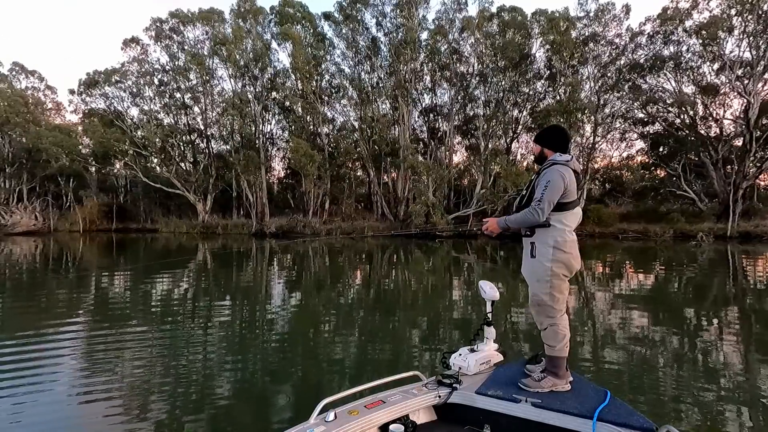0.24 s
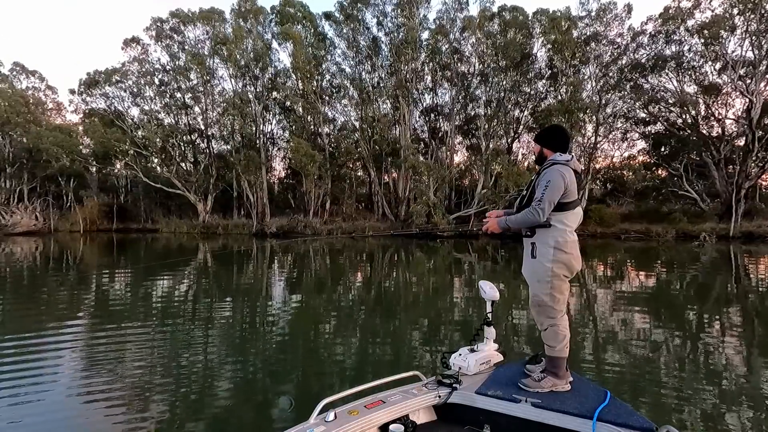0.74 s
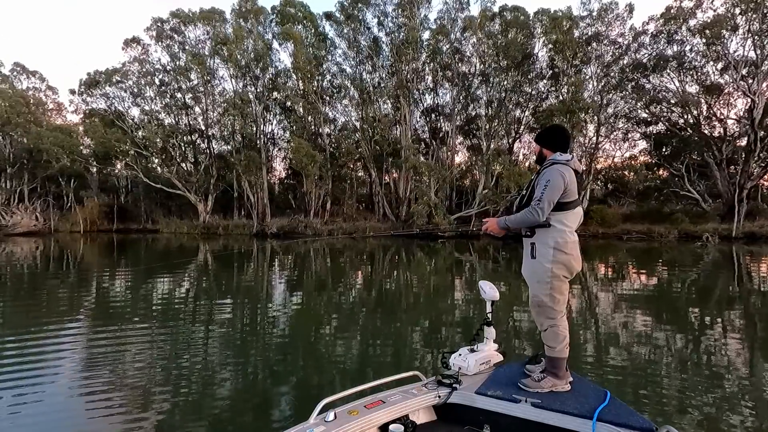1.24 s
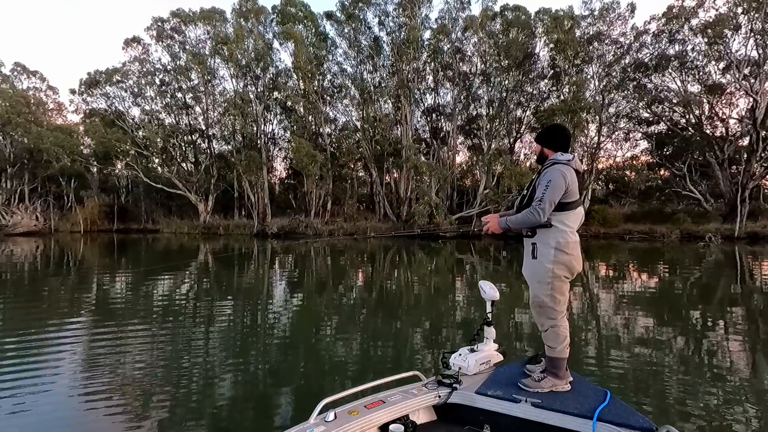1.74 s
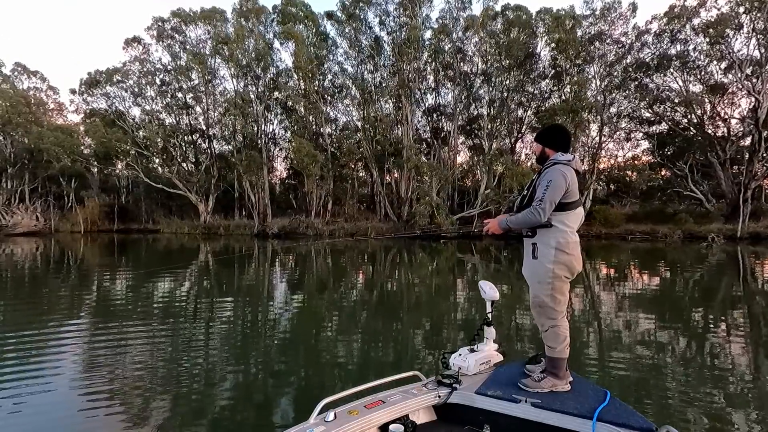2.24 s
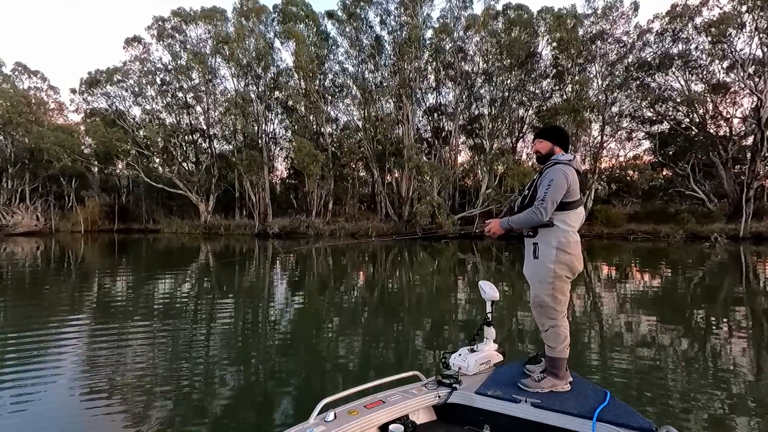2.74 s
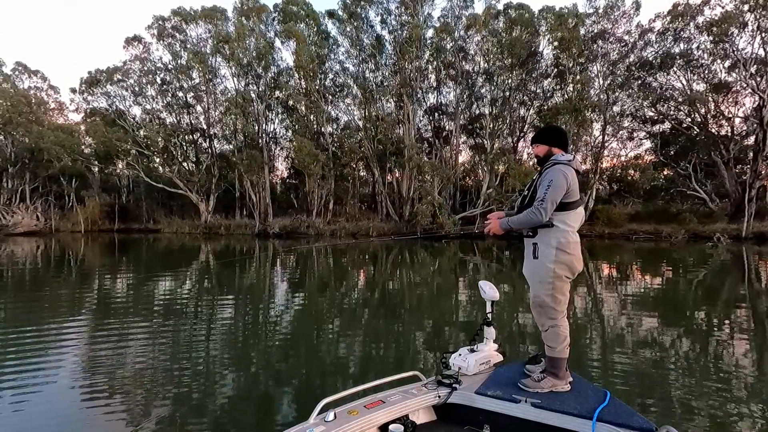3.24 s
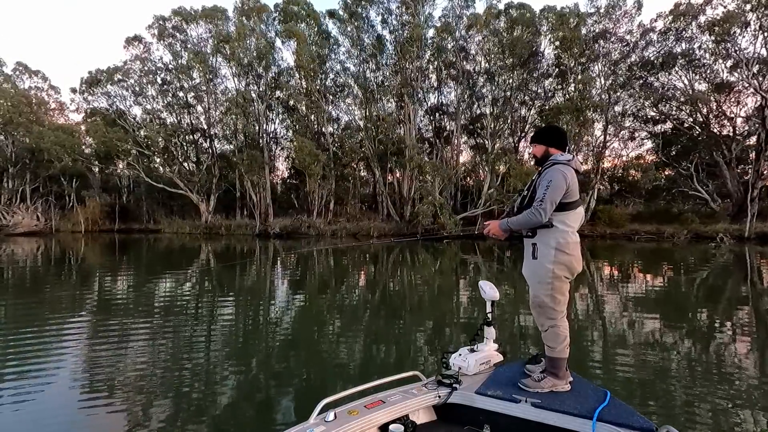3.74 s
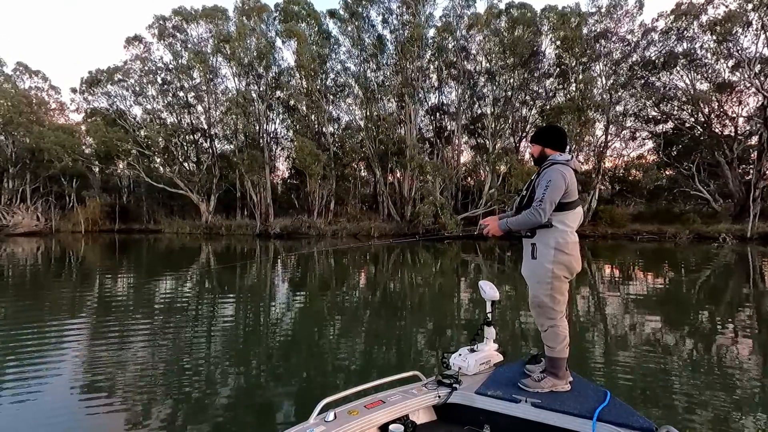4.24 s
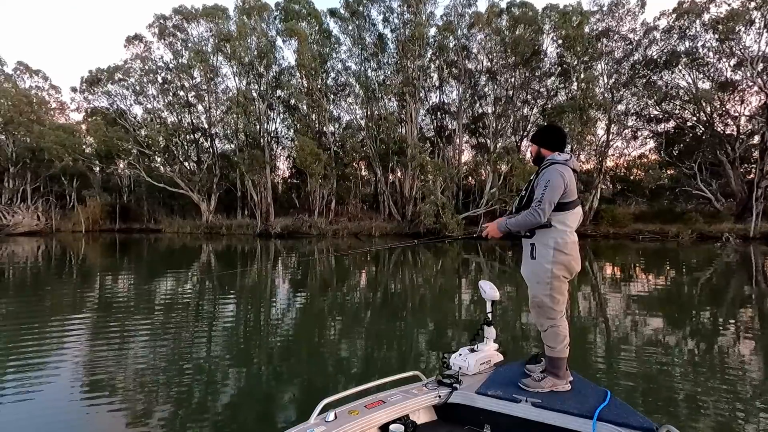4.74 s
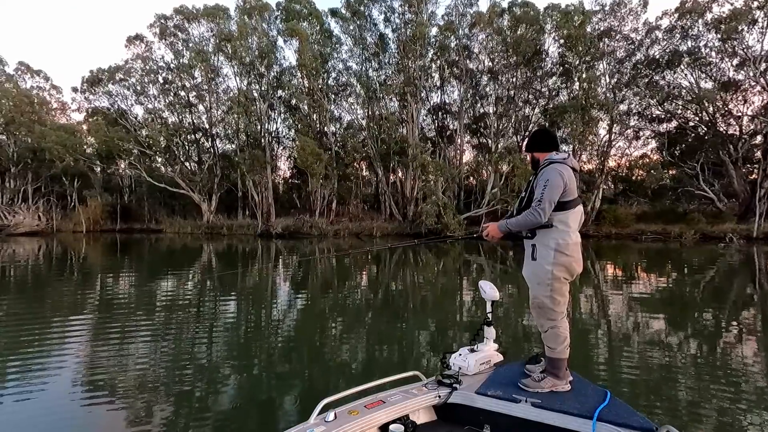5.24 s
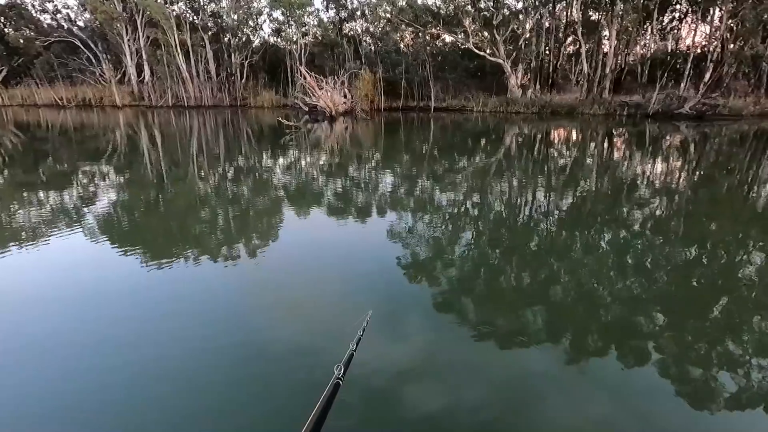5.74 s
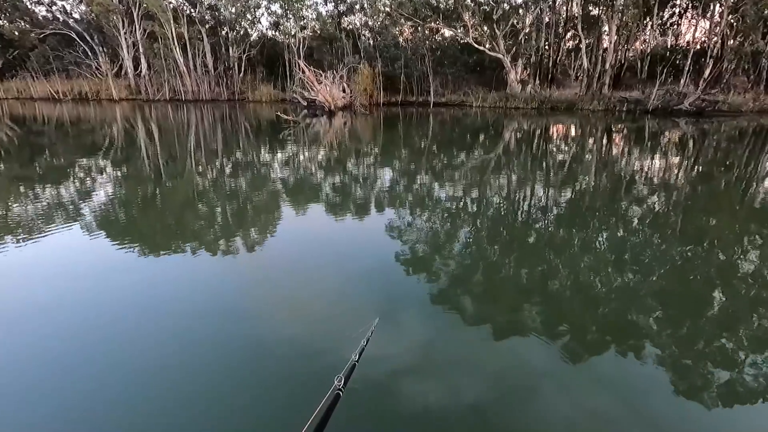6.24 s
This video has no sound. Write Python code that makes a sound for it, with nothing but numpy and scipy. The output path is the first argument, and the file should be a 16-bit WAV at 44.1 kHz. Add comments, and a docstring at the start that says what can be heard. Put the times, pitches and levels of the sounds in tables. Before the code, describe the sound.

From the start, a dense chorus of cockatoos screeches from the trees along a river, heard from a boat across the water. Nearer birds stand out with short wails, hoarse screeches and quavering calls, while the distant flock swells and fades behind them with a forest echo. Longer cries sink in pitch at about 2 and 3 seconds, and again from 4 to 5 seconds. Small songbirds add thin chips, trills and fluted notes, mostly around 1.8, 2.5 and 3.4 seconds. Very faint low air lies underneath. At 5.6 seconds everything cuts to silence for a quarter of a second. At about 5.9 seconds the chorus returns louder and more diffuse, with one sharp, close click of fishing tackle and a soft bump on the hull. A second soft bump follows at 6.1 seconds, and the birds carry on until the end at about 6.5 seconds.

```python
"""A wooded river at dawn, heard from a boat. Cockatoos screech from the trees on the bank, the nearer birds
standing out from the flock; each cry is a stack of harmonics shaped by throat and beak. Songbirds add
fluted notes, chips and trills, and the forest throws everything back over the water. Faint low air lies
underneath. Near the end the sound breaks off briefly and resumes louder, with one sharp click and two
soft bumps on the boat."""
import sys
import numpy as np
from scipy import signal
from scipy.fft import rfft, irfft
from scipy.io import wavfile
from scipy.ndimage import uniform_filter1d

SR = 44100
rng = np.random.default_rng(int(sys.argv[2]) if len(sys.argv) > 2 else 0)


def waveform_to_disk(signal):
    """Save audio, clipped to [-1, 1], as 16-bit WAV at the path in sys.argv[1]."""
    frames = np.transpose(np.atleast_2d(signal))
    scaled = np.clip(frames, -1, 1) * 32767
    samples = np.round(scaled).astype(np.int16)
    wavfile.write(sys.argv[1], SR, samples)


N = 286209
TIME = np.arange(N) / SR
PROGRESS = np.linspace(0, 1, 61)  # from the start of a cry to its end

# A cockatoo's throat. Each row: frequency in Hz, gain in dB.
THROAT = [(500, -7), (750, -12.5), (1050, -9), (1500, -7), (2300, -1.9), (3000, -5), (4000, -10),
          (5200, -17), (6400, -28), (7500, -40.5), (9000, -72)]
# The brief break in the sound, silent from the second row. Each row: time in seconds, gain.
BREAK = [(5.602, 1), (5.606, 0), (5.85, 0), (5.868, .2), (5.9, .85), (5.915, 1)]


def cockatoo(rows, hoarse, edge_s, flutter_db, lift, throat=THROAT):
    """A near cry and its start time: hoarseness shakes pitch and level, the beak lifts nearby harmonics."""
    t = np.arange(rows[0][0] - edge_s / 2, rows[-1][0] + edge_s / 2, 1 / SR)
    hz, effort_db, beak_hz, bright_db = follow(rows, t)
    tremble = 1 + .065 * hoarse * wander(t, 500)
    turns = np.cumsum(uniform_filter1d(hz, size=400, mode="nearest") * tremble) / SR
    cry = np.zeros(len(t))
    for k in range(1, 13):
        beak = 1 + lift / (1 + ((k * hz - beak_hz) / 200) ** 2)
        flutter = flutter_db / beak * wander(t, 45.16)  # harmonics away from the resonance are unsteady
        level = gain_of(effort_db + read(throat, k * hz) + bright_db * np.log2(k * hz / 2300) + flutter)
        cry += level * beak * np.cos(2 * np.pi * (k * turns + rng.random()))
    fade = np.clip(np.minimum(t - t[0], t[-1] - t) / edge_s, 0, 1)
    rasp = 1 + (.15 + .35 * hoarse) * wander(t, 700)
    sputter = gain_of(2.5 * hoarse * np.tanh(wander(t, 140)))
    return t[0], np.sqrt(2) * cry * fade * rasp * sputter


def wails(rise_db, fall_db, beak_shift_s):
    """Short cries from the bank: one arch of pitch, one swell of effort, and the beak shifts at its peak."""
    # Each row: start and length in seconds; first, middle and last pitch in Hz; effort in dB; place of
    # the peak 0-1; first and last beak resonance in Hz; brightness in dB per octave.
    cries = [(0.136, 0.18, 746, 744, 716, -50.5, 0, 2650, 2350, 6),
             (0.172, 0.09, 657, 664, 637, -49, 0.5, 1950, 1950, -10),
             (0.324, 0.1, 722, 710, 682, -51.5, 0.6, 2850, 3400, 0),
             (0.815, 0.04, 864, 926, 923, -44.5, 0.55, 2690, 2800, 5),
             (1.202, 0.08, 748, 744, 824, -46, 0.33, 2600, 1900, 6.5),
             (1.314, 0.08, 677, 660, 652, -60, 0.5, 2000, 1300, 1.5),
             (1.476, 0.055, 603, 654, 610, -54, 0.3, 1280, 1850, -4),
             (1.965, 0.038, 715, 765, 690, -51, 0.5, 2250, 2250, 6.5),
             (2.351, 0.039, 770, 760, 740, -49, 0.6, 3090, 3050, -2),
             (2.673, 0.08, 735, 776, 743, -52, 0.5, 3050, 3050, 4),
             (2.77, 0.05, 760, 745, 713, -51.5, 0.3, 3000, 2900, 3.5),
             (2.928, 0.13, 645, 679, 701, -49.5, 0.6, 1950, 2100, -0.5),
             (3.123, 0.045, 668, 689, 696, -48, 0.55, 2060, 2060, -4.5),
             (3.214, 0.1, 597.5, 613, 590, -48.5, 1, 1800, 1780, -4),
             (3.312, 0.054, 677, 720, 686, -53, 0.2, 2070, 2120, 2),
             (4.385, 0.038, 795, 834, 780, -47.5, 0.6, 1640, 1640, -4.5),
             (5.177, 0.048, 924, 940, 910, -51, 0, 2750, 2780, 4),
             (5.274, 0.069, 891, 839, 770, -38, 0.65, 2110, 2150, 0),
             (5.927, 0.074, 724, 716, 652, -32, 0.53, 2110, 1380, -1.5),
             (6.108, 0.063, 770, 743, 700, -51, 0.7, 2640, 2650, 9)]
    mix = np.zeros(N)
    for start, length, *pitches, peak_db, peak, first_beak_hz, last_beak_hz, bright_db in cries:
        peak = np.clip(peak, .05, .95)
        hz = np.polyval(np.polyfit([0, .5, 1], pitches, 2), PROGRESS)
        from_peak = np.interp(PROGRESS, [0, peak, 1], [-1, 0, 1])
        effort_db = peak_db - np.where(from_peak < 0, rise_db, fall_db) * from_peak ** 2
        beak_hz = np.interp((PROGRESS - peak) * length, [0, beak_shift_s], [first_beak_hz, last_beak_hz])
        rows = as_rows(start + length * PROGRESS, hz, effort_db, beak_hz, bright_db)
        add(mix, *cockatoo(rows, hoarse=.08, edge_s=.012, flutter_db=3.5, lift=4.6))
    return mix


def long_cries():
    """Long cries from the near trees, sinking in pitch as the breath runs out."""
    # One list a cry. Each point: time in seconds, pitch in Hz, effort in dB, beak resonance in Hz.
    cries = [
        [(1.645, 529.5, -50, 1100), (1.685, 558, -52.5, 1100), (1.75, 542, -60.5, 1100)],
        [(2.01, 788, -44.5, 1900), (2.09, 804, -42, 2130), (2.19, 769.5, -46, 2400), (2.235, 744, -40, 2950),
         (2.265, 723, -44, 2880), (2.29, 696, -44.5, 1400), (2.35, 646, -56, 1300), (2.41, 613, -51.5, 1238)],
        [(3.0, 781, -48.5, 2350), (3.05, 785, -47.5, 2380), (3.1, 763.4, -43, 2830), (3.16, 735.5, -44, 2800),
         (3.2, 715, -45.5, 1450), (3.27, 650, -46.5, 1280), (3.31, 596, -47.5, 1190)],
        [(3.96, 576, -50.5, 1140), (4.05, 559, -47.5, 1500), (4.12, 582, -44.5, 1730),
         (4.17, 563.6, -46.5, 1840), (4.24, 557, -45.5, 2230), (4.3, 507, -49, 2120)],
        [(4.305, 705, -47, 2150), (4.36, 753, -41.5, 2300), (4.44, 757, -41.5, 2280), (4.5, 738.5, -39, 2310),
         (4.54, 722.5, -40.5, 3000), (4.61, 687.4, -38, 2730), (4.645, 653, -43, 2580),
         (4.72, 594, -45.5, 1200)],
        [(4.72, 561, -56.5, 1100), (4.81, 538, -49.5, 1090), (4.86, 601.6, -48, 1200), (4.95, 560, -53.5, 1060),
         (5.06, 532, -57, 1100)],
    ]
    # The throat held wide open. Each row: frequency in Hz, gain in dB.
    open_throat = [(500, -20), (780, -12.5), (1050, -7.5), (1400, -7), (1800, -9.5), (2250, -1), (2550, -9),
                   (2900, -3), (3200, -8), (4000, -10.5), (4500, -11), (5200, -18), (6200, -30.5),
                   (7500, -44), (9000, -70)]
    mix = np.zeros(N)
    for points in cries:
        rows = [(*point, 0) for point in points]  # no added brightness
        add(mix, *cockatoo(rows, hoarse=.08, edge_s=.015, flutter_db=3, lift=3.6, throat=open_throat))
    return mix


def warbles():
    """Quavering calls nearby: the pitch swings from syllable to syllable while the beak stays put."""
    # Each row: beak resonance in Hz, brightness in dB per octave, hoarseness 0-1, then points of
    # time in seconds, pitch in Hz, effort in dB.
    calls = [(2200, 0.5, 0.24, [(-0.01, 781.5, -40), (0.02, 805, -37.5), (0.055, 742, -37.5),
             (0.09, 793, -39.5), (0.112, 777, -41.5), (0.13, 666, -42)]),
             (2730, 1, 0.13, [(0.43, 748, -46.5), (0.448, 821, -37.5), (0.47, 920, -49),
             (0.495, 833, -41.5), (0.512, 830, -47.5), (0.53, 937, -37.5), (0.55, 918, -39),
             (0.57, 792, -51.5)]), (2390, 3, .3, [(0.595, 781, -56.5), (0.612, 813, -43), (0.63, 863, -47),
             (0.665, 854, -39.5)]), (2500, -1, 0.25, [(0.67, 688, -42), (0.7, 665, -38), (0.72, 735, -39),
             (0.742, 768, -39)]), (2250, 4, 0.39, [(0.76, 748, -45.5), (0.775, 767, -45), (0.785, 767, -44),
             (0.797, 730, -43.5), (0.85, 749, -48), (0.87, 795, -46), (0.9, 774, -45)]),
             (2800, 2.5, .17, [(1.015, 768, -44), (1.04, 810, -48.5), (1.057, 849, -47),
             (1.075, 805, -39.5), (1.092, 795, -49), (1.113, 798, -38), (1.138, 762, -45), (1.17, 825, -43),
             (1.2, 843, -47.5)]), (2560, -2.5, 0.12, [(2.025, 803, -48), (2.06, 886, -48.5),
             (2.095, 831, -47.5), (2.125, 897, -43), (2.148, 797, -44.5), (2.18, 794, -46),
             (2.225, 844, -46.5), (2.26, 847, -50), (2.3, 830, -50.5)]),
             (2350, -4.5, 0.13, [(2.49, 790, -47), (2.53, 811.6, -46.5), (2.56, 804, -43.5),
             (2.58, 749, -40.5), (2.62, 713, -49.5)]), (3180, -1, .16, [(2.46, 766, -45.5),
             (2.51, 823, -49), (2.535, 775, -45), (2.575, 788, -40.5), (2.59, 763, -41), (2.63, 809, -41),
             (2.665, 822, -37.5)]), (2500, -1, .17, [(2.68, 714, -40), (2.71, 736, -41.5),
             (2.735, 790, -42), (2.75, 835, -34), (2.772, 849, -37), (2.787, 794, -50), (2.81, 758, -43.5),
             (2.835, 686, -40)]), (2630, 1.5, .13, [(3.01, 793, -54.5), (3.035, 880, -39), (3.05, 896, -41),
             (3.07, 856, -38.5), (3.09, 730, -44)]), (2700, 0, .2, [(3.19, 790, -48), (3.22, 874, -47),
             (3.245, 905, -49.5), (3.275, 865, -49.5)]), (2150, -1, .12, [(3.6, 694, -53),
             (3.625, 755, -46), (3.645, 700, -49.5), (3.66, 653, -54.5), (3.69, 685, -45.5)]),
             (2700, 2, .14, [(3.755, 734, -45.5), (3.795, 804, -51), (3.815, 759, -47), (3.855, 773, -48),
             (3.878, 715, -48.5)]), (2850, 2, 0.22, [(4.185, 873, -44.5), (4.205, 829, -47.5),
             (4.225, 939, -43), (4.252, 914, -41.5), (4.268, 820, -47.5), (4.29, 896, -48.5),
             (4.315, 884, -45), (4.335, 873, -40.5), (4.365, 831, -39.5)]),
             (3070, 1.5, 0.31, [(5.045, 765, -53), (5.07, 815, -48), (5.1, 759, -43), (5.145, 817, -38)]),
             (3140, 5, .2, [(5.175, 800, -42), (5.195, 825, -43), (5.22, 771, -51), (5.245, 770, -45),
             (5.275, 773, -43.5)])]
    mix = np.zeros(N)
    for beak_hz, bright_db, hoarse, points in calls:
        rows = [(*point, beak_hz, bright_db) for point in points]
        add(mix, *cockatoo(rows, hoarse, edge_s=.01, flutter_db=4.5, lift=1.8))
    return mix


def screeches(pitch_hz, arch, swell_db, beak_hz):
    """Hoarse screeches: pitch and effort rise and fall together, each bird on its own unsteady pitch."""
    # Each row: start and length in seconds, effort in dB, brightness in dB per octave, hoarseness 0-1.
    cries = [(-0.03, 0.22, -39.5, 0.5, 0.46), (0.738, 0.046, -39.5, 3.5, 0.8),
             (0.792, 0.08, -43.5, 3, 0.34), (1.418, 0.11, -53.5, 2.5, 0.54), (2.239, 0.15, -45, 3, 0.44),
             (2.558, 0.19, -45.5, 2, .3), (2.801, 0.11, -43.5, -5.5, 0.48), (3.1, 0.19, -43, 2.5, 0.26),
             (3.976, 0.07, -41.5, 1.5, 0.5), (4.648, 0.13, -42, -0.5, 0.56), (5.911, 0.12, -35, 0, 0.5),
             (6.078, 0.11, -43.5, -8, 0.3)]
    mix = np.zeros(N)
    slack = (2 * PROGRESS - 1) ** 2
    for start, length, effort_db, bright_db, hoarse in cries:
        t = length * PROGRESS
        own_hz = pitch_hz * (1 + .1 * rng.uniform(-1, 1))
        hz = own_hz * (1 - arch * slack + .035 * wander(t, 40))
        rows = as_rows(start + t, hz, effort_db - swell_db * slack, beak_hz, bright_db)
        add(mix, *cockatoo(rows, hoarse, edge_s=.02, flutter_db=3, lift=.3))
    return mix


def far_cries(count, pitch_hz, spread, jitter, quaver, longest_s):
    """Distant cockatoos: many arched, quavering cries at random moments, some clear, some hoarse."""
    mix = np.zeros(N + SR)
    for i, (when, length, pitch, hoarse, size, speed, lean) in enumerate(rng.random((count, 7))):
        t = np.arange(0, longest_s * (.3 + .7 * length), 1 / SR)
        arch = 1 - .3 * (t / t[-1] - .2 - .35 * lean) ** 2
        vibrato = quaver * lean * np.sin(2 * np.pi * ((9 + 9 * speed) * t + when))
        tremble = 1 + jitter * hoarse ** 2 * wander(t, 900)
        hz = pitch_hz * (1 + spread * (2 * pitch - 1)) * (arch + vibrato) * tremble
        fundamental = np.exp(2j * np.pi * np.cumsum(hz) / SR)
        harmonic, cry = np.ones(len(t), complex), np.zeros(len(t))
        for weight in rng.standard_normal((13, 2)) @ [1, 1j]:  # random strength and phase
            harmonic = harmonic * fundamental
            cry += (weight * harmonic).real * (1 + 0.73 * wander(t, 40))
        start = (i + when) / count * len(mix) / SR
        add(mix, start, gain_of(4.6 * size) * evened(cry) * signal.windows.tukey(len(t), .3))
    return evened(mix[SR // 2:][:N])


def flock(level_db, wet_db):
    """Echoing cries deep in the trees and yelps from their edge; after the break, one diffuse chorus."""
    # The flock's swells. Each row: time in seconds, level in dB, throatiness in dB, shrillness in dB.
    swells = [(0.0, -36.5, 6, 3.5), (0.32, -38, 3.5, -1), (0.6, -37.5, 6, 3), (0.8, -36.5, 5.5, -4),
              (0.95, -36.5, 1, -1), (1.27, -43.5, 5, 3), (1.52, -41, 9, -0.5), (1.74, -43, 10, -1.5),
              (1.92, -45.5, 5, 0), (2.15, -40.5, 6.5, 9), (2.3, -37.5, 8.5, -5), (2.44, -37.5, 1, -0.5),
              (2.6, -39.5, 3, -1), (2.9, -35, 1.5, 2), (3.27, -36.5, 5.5, -1.5), (3.4, -42, 6.5, 1.5),
              (3.72, -46, 8, -4.5), (3.94, -36, 3.5, -1), (4.38, -41.5, 3.5, 3), (4.75, -37, 2, 0.5),
              (5.3, -38, 0, -1), (5.42, -44, 1.5, 3), (5.58, -46, 6.5, 2)]
    # The flock from across the water. Each row: frequency in Hz, gain in dB.
    flock_colour = [(250, -45), (450, -22), (580, -8), (700, -5), (830, -12.5), (1000, -9.5), (1450, -3.5),
                    (1850, -4.5), (2200, 5), (2550, 0.5), (3000, -0.5), (4000, -8.5), (5000, -15.5),
                    (6500, -29), (9000, -62.5)]
    # The louder chorus. Each row: time in seconds, level in dB.
    chorus_level = [(5.87, -31), (6.02, -31.5), (6.14, -27), (6.23, -32), (6.35, -30), (6.49, -31.5)]
    # Its tone. Each row: frequency in Hz, gain in dB.
    chorus_colour = [(200, -42), (400, -29), (620, -9.5), (900, -22), (1150, -17), (1450, -3.5),
                     (1940, -1.5), (2350, 4), (2900, -1.5), (4500, -9), (5500, -23), (7800, -41.5),
                     (10000, -65)]
    deep = far_cries(count=150, pitch_hz=710, spread=.27, jitter=.07, quaver=.04, longest_s=.35)
    yelps = far_cries(count=120, pitch_hz=770, spread=.18, jitter=.04, quaver=.06, longest_s=.13)
    echo = forest(deep + 0.68 * yelps, t60=2.6, build_s=0.016)
    crowd = blended(evened(deep + gain_of(wet_db) * echo) + .45 * yelps)
    spectrum = rfft(steadied(coloured(crowd, flock_colour)))
    hz = np.fft.rfftfreq(N, 1 / SR)
    low_share = 1 / (1 + (hz / 1450) ** 6)
    high_share = 1 - 1 / (1 + (hz / 3500) ** 7)
    middle_share = 1 - low_share - high_share
    low, middle, high = (irfft(spectrum * share, N) for share in (low_share, middle_share, high_share))
    swell_db, throaty_db, shrill_db = follow(swells, TIME)
    voices = middle + gain_of(throaty_db) * low + gain_of(shrill_db) * high
    before = gain_of(level_db + swell_db) * voices / middle.std()
    chorus = steadied(coloured(blended(echo + .3 * yelps), chorus_colour))
    after = gain_of(follow(chorus_level, TIME)[0]) * chorus
    return np.where(TIME < BREAK[1][0], before, after)


def thin_notes():
    """Thin gliding notes: small birds' chips and trills, and a few high cockatoo overtones."""
    # Each row: start and length in seconds, first and last pitch in Hz, level in dB, buzzy rasp 0-1.
    notes = [(0.095, 0.025, 2420, 1900, -32, 0.25), (1.73, 0.016, 5500, 4970, -55, 0.55),
             (1.747, 0.028, 4110, 4240, -48.5, 0.38), (1.774, 0.036, 5330, 5100, -52, 0.1),
             (1.804, 0.014, 4520, 4400, -47, 0.5), (1.81, 0.045, 960, 920, -46, 0.24),
             (1.827, 0.019, 5030, 4840, -58, 0.3), (1.821, 0.033, 4150, 4030, -56, 0.4),
             (1.845, 0.12, 1162, 1130, -45.5, 0.12), (2.491, 0.03, 4700, 4980, -49.5, 0.15),
             (2.574, 0.016, 5520, 5200, -50, 0.2), (2.611, 0.021, 4830, 4450, -46.5, .2),
             (3.345, 0.11, 8030, 7170, -72.5, 0.4), (3.394, 0.015, 4520, 4500, -41.5, 0.34),
             (3.413, 0.016, 4670, 4390, -44, 0.48), (3.625, 0.16, 4480, 4460, -53, 0.22),
             (5.505, 0.065, 3960, 4180, -51.5, 0.4), (6.359, 0.17, 918, 971, -47, 0.5)]
    mix = np.zeros(N)
    for start, length, first_hz, last_hz, db, rasp in notes:
        t = np.arange(0, length, 1 / SR)
        hz = np.linspace(first_hz, last_hz, len(t)) * (1 + 0.068 * rasp * wander(t, 370))
        swell = signal.windows.tukey(len(t), .5) * (1 + 0.79 * rasp * wander(t, 200))
        add(mix, start, np.sqrt(2) * gain_of(db) * swell * np.sin(2 * np.pi * np.cumsum(hz) / SR))
    return mix


def forest(x, t60, build_s):
    """Echoes from trunks and leaves: sparse taps that build up and die away, the treble sooner."""
    t = np.arange(SR) / SR
    taps = rng.standard_normal(SR) * (rng.random(SR) < .05) * (1 - np.exp(-t / build_s))
    hz, frame_s, spectra = signal.stft(taps, SR, nperseg=256)
    decay = gain_of(-60 * frame_s / t60 * (1 + hz[:, None] / 6000))
    tail = signal.istft(spectra * decay, SR, nperseg=256)[1]
    return signal.fftconvolve(x, tail / np.linalg.norm(tail))[:N]


def boat(click_s, click_db, click_hz, click_decay_s, snap_db):
    """Close to the microphone: a hard, dead click of tackle, and soft bumps that ring the hull."""
    # The first two bumps merge into one. Each row: start in seconds, level in dB, ring time in seconds.
    bumps = [(5.903, -54, 0.06), (5.915, -40.5, 0.19), (6.107, -39.5, 0.16)]
    # The hull's modes. Each row: frequency in Hz, level in dB, share of the ring time.
    hull = [(84, -2.5, 1), (160, 2.5, 0.47), (258, 9, 0.29)]
    mix, t = np.zeros(N), np.arange(SR // 3) / SR
    knock = np.sin(2 * np.pi * click_hz * t) * np.exp(-t / click_decay_s)
    burst = rng.standard_normal(len(t)) * np.exp(-abs(t - .001) / .0004)
    snap = coloured(burst, [(3000, 4), (7000, -16), (10000, -45)])
    add(mix, click_s, gain_of(click_db) * (knock + gain_of(snap_db) * snap))
    soft_onset = 1 - np.exp(-t / 0.0037)
    for start, db, ring_s in bumps:
        modes = sum(gain_of(db + mode_db - 60 * t / (ring_s * share)) * np.sin(2 * np.pi * hz * t)
                    for hz, mode_db, share in hull)
        add(mix, start, modes * soft_onset)
    return signal.sosfilt(signal.butter(3, 60, "highpass", fs=SR, output="sos"), mix)


def air(gust_s, gust_db):
    """A faint low wash over the river, and one puff of breeze on the microphone."""
    # The tone of the open air. Each row: frequency in Hz, gain in dB.
    wash_colour = [(20, -34.5), (55, -17), (110, -19.5), (165, -4.5), (210, -5.5), (300, -7), (450, -2),
                   (900, -0.5), (4000, -39), (12000, -55)]
    # Its rise and fall. Each row: time in seconds, level in dB.
    wash_level = [(0, -58.5), (1.5, -57), (3, -58.5), (4.4, -58), (5.6, -59), (5.9, -45), (6.15, -42),
                  (6.3, -47.5), (6.49, -56)]
    puff_colour = [(20, -18.5), (60, -9.5), (110, -2.0), (300, -24.5), (1500, -80.0)]
    wash = evened(coloured(rng.standard_normal(N), wash_colour))
    wash *= gain_of(follow(wash_level, TIME)[0] + 0.31 * wander(TIME, 32))
    puff = evened(coloured(rng.standard_normal(N), puff_colour))
    return wash + gain_of(gust_db) * puff * np.exp(-((TIME - gust_s) / 0.23) ** 2)


def gain_of(db):
    """Decibels to gain."""
    return 10 ** (np.asarray(db) / 20)


def evened(x):
    """Scales to rms 1."""
    return x / np.sqrt(np.mean(x ** 2) + 1e-20)


def steadied(x):
    """Holds the running level of a crowd of cries at rms 1."""
    return x / np.sqrt(uniform_filter1d(x ** 2, size=3500) + 1e-12)


def blended(x):
    """Evens out the long-term spectrum, as many voices of different sizes do."""
    spectrum = rfft(x)
    power = abs(spectrum) ** 2
    return evened(irfft(spectrum / np.sqrt(uniform_filter1d(power, size=600) + 1e-3 * power.mean()), N))


def read(points, hz):
    """A spectrum's value at hz, joined on a log axis."""
    f, value = np.transpose(points)
    return np.interp(np.log(hz + 1), np.log(f + 1), value)


def coloured(x, points):
    """Filters x by a spectrum of (Hz, dB) points."""
    return irfft(rfft(x) * gain_of(read(points, np.fft.rfftfreq(len(x), 1 / SR))), len(x))


def as_rows(*columns):
    """Sets curves and constants side by side as a table."""
    return np.column_stack(np.broadcast_arrays(*columns))


def follow(rows, t):
    """A table's curves at the times t; its first column is time."""
    times, *columns = np.transpose(rows)
    return [np.interp(t, times, column) for column in columns]


def wander(t, per_s):
    """A random drift of about unit size, with per_s new values a second."""
    knots = np.arange(t[0], t[-1] + 2 / per_s, 1 / per_s)
    return np.interp(t, knots, rng.standard_normal(len(knots)))


def add(mix, start_s, sound):
    """Mixes a sound in at start_s, trimmed to fit."""
    at = round(start_s * SR)
    sound = sound[max(-at, 0):]
    part = mix[max(at, 0):][:len(sound)]
    part += sound[:len(part)]


def scene():
    """From the boat, in mono: near birds with their forest echo, over the far flock, air and hull."""
    near = wails(rise_db=5, fall_db=3, beak_shift_s=0.034) + long_cries() + warbles()
    harsh = screeches(pitch_hz=756.8, arch=.1, swell_db=1.5, beak_hz=2560)
    notes = thin_notes()
    bright_notes = coloured(notes, [(1200, -9), (3500, 0)])  # the high notes echo most
    into_trees = gain_of(-15.5) * near + gain_of(-8.5) * harsh + gain_of(-5) * bright_notes
    echo = forest(into_trees, t60=1.0, build_s=0.013)
    birds = near + harsh + notes + echo + flock(level_db=-2.5, wet_db=-5.0)
    breeze = air(gust_s=1.98, gust_db=-69.5)
    knocks = boat(click_s=5.9005, click_db=-24, click_hz=664, click_decay_s=0.0014, snap_db=6.0)
    return (birds + breeze + knocks)[None]


def record(dry):
    """The sound breaks off for a quarter of a second, and the top treble is cut throughout."""
    heard = dry * follow(BREAK, TIME)[0]
    lowpass = signal.firwin(511, cutoff=12700, window=("kaiser", 9), fs=SR)
    return signal.oaconvolve(heard, lowpass[None], "same")


dry = scene()
out = record(dry)
waveform_to_disk(out)
```